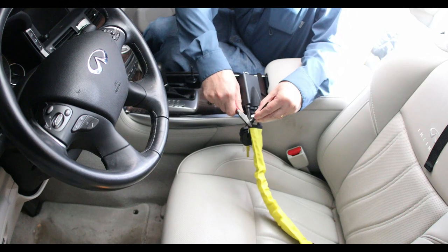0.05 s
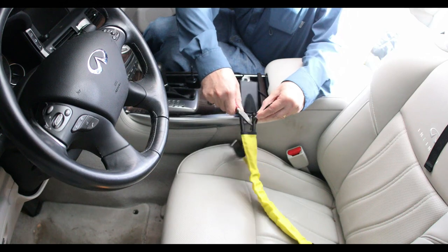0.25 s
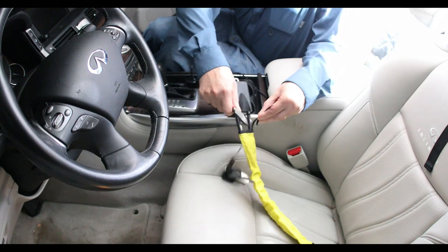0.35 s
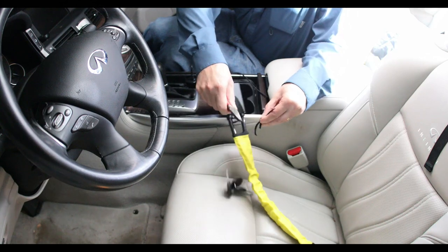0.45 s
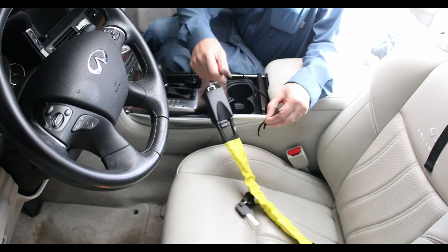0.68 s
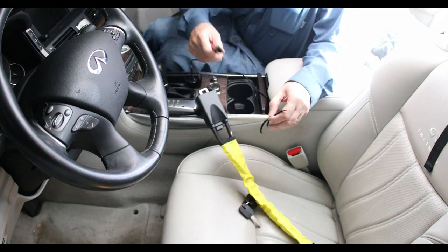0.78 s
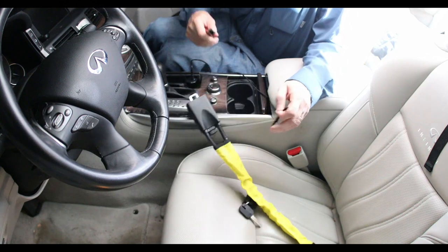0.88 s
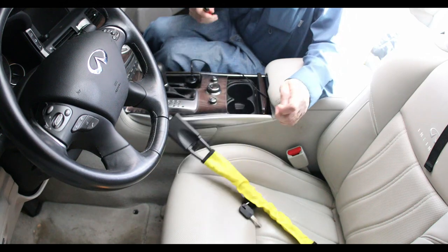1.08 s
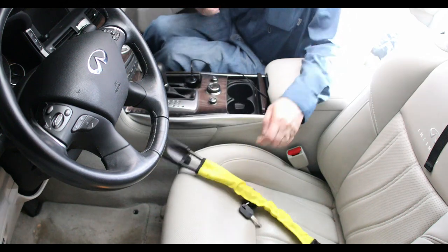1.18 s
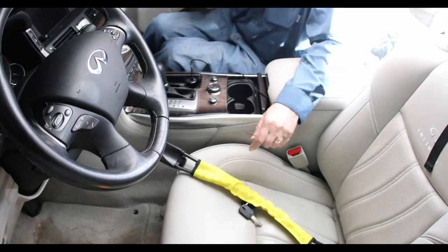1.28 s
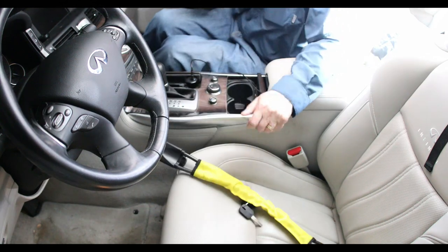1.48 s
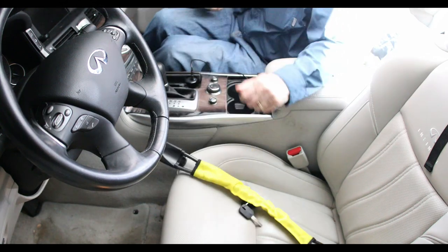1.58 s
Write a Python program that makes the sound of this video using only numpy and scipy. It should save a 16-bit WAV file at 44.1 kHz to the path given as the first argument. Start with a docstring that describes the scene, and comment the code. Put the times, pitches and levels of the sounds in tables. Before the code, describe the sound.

A steering wheel lock snaps open with a sharp metal click at 0.2 seconds, and its buckle springs free at 0.3 with a clack and low thump. A softer bump follows near 0.5. The strap rustles quietly over a leather seat until about 1.2 seconds, when the lock scrapes and knocks to rest with a light clink and faint keys. A tiny rattle follows near 1.6 in the padded car.

```python
"""A steering wheel lock is undone inside a car. First its steel latch snaps open; a tenth of a second
later the buckle springs free with a clack that thumps the console. Each impact excites damped modes.
The strap then slides over the softly rustling leather seat, its friction a grainy noise. Near 1.2 s
the lock head scrapes and knocks to rest by the wheel, keys chink and the steel bar clinks; last, the
latch rattles faintly. Throughout, the padded cabin answers the impacts briefly."""
import sys
import numpy as np
from scipy import signal
from scipy.fft import rfft, irfft, next_fast_len
from scipy.io import wavfile
from scipy.ndimage import map_coordinates

SR = 44100
rng = np.random.default_rng(int(sys.argv[2]) if len(sys.argv) > 2 else 0)


def transcribe(u):
    """Save the signal u as a 16-bit wav file named by the first command-line argument.

    u: samples, shape (n,) or (channels, n), limited to [-1, 1]; the rate is SR.
    q: integer samples, one column per channel.
    """
    v = np.clip(np.atleast_2d(u).T, -1, 1)
    q = np.round(v * 32767).astype(np.int16)
    wavfile.write(sys.argv[1], SR, q)


N = 72765
T = np.arange(N) / SR

# Crack spectrum of latch and bar. Each row: frequency in Hz, relative level in dB.
STEEL_CRACK = [(120, -49), (200, -10), (380, -15.5), (647, -29), (933, -22), (1230, -27), (1590, -25.5),
               (2090, 1.5), (2420, -8.5), (3620, -20), (4950, -3.5), (5520, -14.5), (7540, -8), (9060, -10),
               (16000, -30)]


def latch():
    """Impact excitation: the steel latch snaps and later rattles, with little bass."""
    # Each row: start in seconds, level in dB, tilt in dB per octave, rise in seconds.
    clicks = [(0.2136, -8.5, 0, 0.00027), (0.2665, -35.5, -0.5, 0.00067), (1.572, -44.5, -17, 0.0024)]
    # Each row: frequency in Hz, relative level in dB, T60 in seconds before added damping.
    modes = [(354, -11.5, 0.079), (897, -12, .06), (2090, 0.5, 0.046), (4420, -2.5, 0.049),
             (4623, -5.5, 0.05), (5014, 0.5, 0.04), (7030, -10.5, 0.05), (8300, -11.5, 0.036),
             (8720, -2, .024), (9250, -11, 0.077)]
    x = strikes(clicks, modes, STEEL_CRACK, ring_db=-2, crack_db=0, crack_t60=0.035, damping=1.3)
    return low_cut(x, hz=240)


def lock_head():
    """Free vibration: the lock head rings as the buckle springs free and again as it lands."""
    # Each row: start in seconds, level in dB, tilt in dB per octave, rise in seconds.
    knocks = [(0.3108, -28, -4, 0.00041), (0.3145, -9.5, 0.5, 0.00015), (1.2481, -34.5, -0.5, 0.00075)]
    # Each row: frequency in Hz, relative level in dB, T60 in seconds before added damping.
    modes = [(2010, -7.5, 0.2), (4130, 3, 0.051), (4340, 0.5, 0.032), (6480, -1.5, 0.024),
             (9500, -20, 0.13), (10610, -6, 0.038), (11970, -9, 0.048)]
    # Each row: frequency in Hz, relative level in dB.
    crack = [(180, -16), (300, 6), (420, -6.5), (700, -9), (1200, -22.5), (1450, -11.5), (2300, -18),
             (4200, -15.5), (5000, -20.5), (6700, -18.5), (9500, -33), (11500, -24), (16000, -40.5)]
    return strikes(knocks, modes, crack, ring_db=-2, crack_db=-0.5, crack_t60=0.078, damping=1.5)


def housing():
    """Shell resonance: the modes of the buckle's housing give the release its hollow clack."""
    # Each row: start in seconds, level in dB.
    clacks = [(.3122, -23.5), (0.3184, -21.5), (.461, -36)]
    # Each row: frequency in Hz, relative level in dB, T60 in seconds.
    modes = [(424, -3.5, 0.21), (593.8, 2, .12), (842, -5, .1), (1025, -4.5, .06), (1425, -3, .05),
             (1633, -3, .06)]
    return sum(delayed(amp(db) * ring(modes) * attack(0.0008), s) for s, db in clacks)


def thuds():
    """Heavy damping: padded console and seat turn each blow into a short, dull band of noise."""
    # Each row: start in seconds, level in dB, band centre in Hz, width in octaves, T60 in seconds.
    blows = [(.291, -38, 403, 2, 0.23), (.3118, -20.5, 293, 1.05, 0.087), (.3115, -23.5, 1560, 0.36, 0.03),
             (.459, -22.5, 225, 0.65, 0.13), (0.714, -37, 218, 0.24, 0.092), (.74, -35, 138, 0.21, .3),
             (1.211, -24.5, 348, 0.19, 0.048), (1.2502, -27.5, 1920, 2, 0.037),
             (1.412, -42, 329, 0.4, 0.32), (1.481, -39, 284, 0.34, 0.057), (1.629, -42, 218.5, 0.2, 0.16)]
    x = np.zeros(N)
    for s, db, centre, width, t60 in blows:
        band_db = lambda hz: -22 * np.log10(1 + (np.log2((hz + 1) / centre) / width) ** 2)
        treble_loss_db = lambda hz: 20 * np.log10(1 + (hz / 2200) ** 2)
        pad = noise(lambda hz: band_db(hz) - bass_loss_db(hz, 70) - treble_loss_db(hz))
        x += delayed(pad * amp(db - 60 * T / t60) * attack(0.0016), s)
    return x


def booms():
    """Enclosure resonance: the heavier blows ring the low modes of console and cabin."""
    # Each row: start in seconds, level in dB, tilt in dB per octave.
    blows = [(.316, -12.5, 3), (.464, -28, -5), (1.261, -44.5, 2), (1.322, -43.5, -5)]
    # Each row: frequency in Hz, relative level in dB, T60 in seconds.
    modes = [(74.9, -2, 0.21), (96.44, -0.5, 0.45), (146.2, -9, 0.36), (213.4, -12.5, 0.65), (258, 1, 0.11),
             (320, -3.5, 0.14)]
    return sum(delayed(amp(db) * ring(modes, tilt) * attack(0.0015), s) for s, db, tilt in blows)


def tongue():
    """Light impacts excite the high modes of the steel tongue as it brushes past things."""
    # Each row: start in seconds, level in dB, tilt in dB per octave, rise in seconds.
    ticks = [(0.3008, -27, 8, 0.0011), (.371, -27.5, -4, 0.0023), (.391, -35, 2.5, .0005),
             (0.4581, -30, -2.5, 0.0028), (0.6947, -35, -2, 0.00068), (1.2258, -32.5, 3.5, .0005)]
    # Each row: frequency in Hz, relative level in dB, T60 in seconds before added damping.
    modes = [(3410, -6, 0.055), (4500, -5, .04), (5410, 0, 0.065), (6030, -2, .04), (9100, -6.5, .05)]
    # Each row: frequency in Hz, relative level in dB.
    crack = [(300, -14.5), (1500, -5.5), (2900, -3.5), (5700, 1), (7500, -6.5), (12800, -16.5),
             (16000, -23.5)]
    return strikes(ticks, modes, crack, ring_db=-3, crack_db=-1, crack_t60=0.04, damping=1.4)


def bar():
    """Inharmonic modes of the steel bar ring as the lock head settles against it."""
    # Each row: start in seconds, level in dB, tilt in dB per octave, rise in seconds.
    clinks = [(1.3282, -28.5, -3.5, 0.0019)]
    # Each row: frequency in Hz, relative level in dB, T60 in seconds.
    modes = [(2000, -0.5, .05), (2390, -10, .035), (3415, -7, .04), (4600, -1, 0.042), (5700, -4, 0.032),
             (6250, -6, 0.039)]
    x = strikes(clinks, modes, STEEL_CRACK, ring_db=-1, crack_db=-2, crack_t60=0.036)
    return low_cut(x, hz=1100)


def keys(rise_s=0.00068, top_hz=13500):
    """Small plates have high modes: the keys chink as they collide after the landing."""
    # Each row: start in seconds, level in dB, tilt in dB per octave.
    chinks = [(1.2708, -36, -1), (1.282, -43, 0), (1.304, -49, 27), (1.343, -47.5, 5.5),
              (1.553, -54.5, -14)]
    # Each row: frequency in Hz, relative level in dB, T60 in seconds.
    modes = [(2850, -0.5, 0.038), (6380, -2, 0.029), (12260, -11, 0.043)]
    # Each row: frequency in Hz, relative level in dB.
    crack = [(1500, -14), (2900, 3.5), (4300, -12), (6600, -9), (10500, -30), (12100, -8), (13000, -32)]
    contacts = [(*chink, rise_s) for chink in chinks]
    x = strikes(contacts, modes, crack, ring_db=-0.5, crack_db=1.5, crack_t60=0.046)
    return filtered(x, lambda hz: 1 / (1 + (hz / top_hz) ** 20))


def strap(reflection_db=-8.5):
    """Sliding friction: the strap rubs, hisses and drives the resonances of the steel."""
    # Each row: time in seconds, rub level in dB, hiss level in dB.
    slide = [(.2, -89.5, -105), (.23, -45.5, -48), (.3, -56, -55.5), (.37, -44, -75), (.44, -52, -46),
             (.53, -54.5, -80), (.68, -59.5, -76), (.8, -60.5, -78), (.93, -62.5, -64), (.98, -62.5, -56.5),
             (1.07, -60.5, -56.5), (1.165, -52, -50), (1.183, -59.5, -64), (1.31, -53.5, -63),
             (1.37, -63, -75.5), (1.51, -70, -88), (1.56, -61, -86), (1.65, -65, -74.5)]
    # Each row of both spectra: frequency in Hz, relative level in dB.
    rub_spectrum = [(290, -45), (560, -10.5), (740, -17), (900, -4), (1160, -19.5), (1420, -5.5),
                    (2570, -13), (7980, -16.5), (16000, -43.5)]
    hiss_spectrum = [(400, -33), (586, -9), (880, -6.5), (1050, -16.5), (1380, -5.5), (2390, -11.5),
                     (3060, -13), (4280, -7), (15100, -19), (16000, -35.5)]
    # Each row: centre in Hz, bandwidth in Hz, relative level in dB.
    steel_peaks = [(3410, 120, -4), (3860, 80, -6.5), (4325, 150, 0), (5820, 360, -10.5)]
    # Each row: time in seconds, level of the metallic ring in dB.
    steel_levels = [(.2, -120), (.3, -58.5), (.66, -60.5), (.8, -57), (.92, -55), (1.11, -65.5),
                    (1.168, -55), (1.2, -92)]
    # Each row: time in seconds, base delay of the seat's reflections in seconds.
    seat_delays = [(.95, 0.00031), (1.08, 0.00049), (1.17, .0005)]
    rub_db, hiss_db = curves(slide)
    steel_db, = curves(steel_levels)
    lag, = curves(seat_delays)
    rub = friction(rub_spectrum, grain_db=2, grain_rate=500)
    steel = resonate(friction(rub_spectrum, grain_db=2, grain_rate=230), steel_peaks)
    hiss = friction(hiss_spectrum, grain_db=2, grain_rate=440)
    # Comb filtering: the delay grows as the lock head swings from the seat, so the hiss sweeps down.
    echo = lambda trips: amp(trips * reflection_db) * map_coordinates(hiss, [(T - trips * lag) * SR])
    swept_hiss = unit(hiss + echo(0.94) + echo(1.7))
    return amp(rub_db) * rub + amp(steel_db) * steel + amp(hiss_db) * swept_hiss


def scrape(start_s=1.192, rise_s=0.00039, hold_s=0.015, t60_s=0.3, level_db=-37.5):
    """Rough friction: the lock head drags coarsely as it lands."""
    # Each row: frequency in Hz, relative level in dB.
    spectrum = [(180, -30), (350, 3.5), (620, 3.5), (1150, 1), (2000, -4), (2900, -8.5), (3500, -6),
                (6000, -19), (9000, -16), (16000, -40)]
    t = T - start_s
    envelope = np.clip(t / rise_s, 0, 1) * amp(-60 * np.maximum(t - hold_s, 0) / t60_s)
    return amp(level_db) * envelope * friction(spectrum, grain_db=2.5, grain_rate=1100)


def hollow(start_width_hz=69):
    """A narrow resonance of the rub glides down as the lock head swings towards its landing."""
    # Each row: time in seconds, centre in Hz, level in dB.
    glide = [(.8, 2767, -100), (.96, 2696, -66), (1.09, 2374, -60), (1.135, 2080, -59.5),
             (1.172, 2000, -50), (1.195, 1990, -100)]
    hz, db = curves(glide)
    band = resonate(rng.standard_normal(N), [(hz[0], start_width_hz, 0)])
    position = np.cumsum(hz / hz[0])  # reading the band more slowly lowers its pitch
    return amp(db) * map_coordinates(band, [position], mode="mirror")


def seat():
    """Friction on a soft surface: leather drags with a low purr over the cushion's rumble."""
    # Each row: time in seconds, drag level in dB, rumble level in dB.
    levels = [(0, -78, -65), (.19, -70.5, -73), (.24, -59, -49.5), (.3, -86, -45.5), (.35, -36, -20),
              (.43, -48.5, -39), (.51, -40.5, -33.5), (.57, -55.5, -48.5), (.68, -55, -49.5),
              (.77, -61.5, -46), (.86, -52.5, -56.5), (.95, -51.5, -59), (1.04, -39, -62),
              (1.18, -46.5, -53), (1.28, -44.5, -36), (1.38, -64, -50), (1.5, -51.5, -49),
              (1.59, -64.5, -69.5)]
    # Each row of both spectra: frequency in Hz, relative level in dB.
    drag_spectrum = [(59, -49.5), (135, -22), (164, -3.5), (220, -1.5), (386, -12.5), (473, -33),
                     (900, -30), (1300, -70)]
    rumble_spectrum = [(20, -37.5), (45, -31), (70, -2), (150, 1), (220, -17), (500, -36.5), (8000, -70.5)]
    drag_db, rumble_db = curves(levels)
    edge_loss_db = lambda hz: 10 * np.log10((1 + (hz / 900) ** 6) * (1 + (90 / (hz + 1)) ** 6))
    drag = noise(lambda hz: along(drag_spectrum, hz) - edge_loss_db(hz))
    rumble = noise(lambda hz: along(rumble_spectrum, hz))
    return amp(drag_db) * drag + amp(rumble_db) * rumble


def trim(x, count=9, level_db=-9):
    """Interference: early reflections from console, door and seat back colour the sound."""
    lags_s = rng.uniform(0.001, 0.008, count)
    near = sum((-1) ** k * delayed(x, lag) for k, lag in enumerate(lags_s)) / np.sqrt(count)
    return (x + amp(level_db) * near) / np.sqrt(1 + amp(level_db) ** 2)


def cabin(x, level_db=-19.5):
    """Reverberation: the padded interior absorbs treble sooner than bass."""
    # Each row: frequency in Hz, T60 in seconds.
    decay_times = [(200, 0.6), (1500, 0.2), (6000, 0.11), (14000, 0.12)]
    hz, t, spectra = signal.stft(rng.standard_normal(SR // 3), SR, nperseg=256)
    decay = amp(-60 * t / along(decay_times, hz)[:, None])
    tail = signal.istft(spectra * decay, SR, nperseg=256)[1]
    return amp(level_db) * signal.fftconvolve(delayed(x, 0.004), tail / np.linalg.norm(tail))[:N]


def background(level_db=-76.5):
    """Stationary noise, faint and mostly low in pitch."""
    # Each row: frequency in Hz, relative level in dB.
    spectrum = [(15, -54.5), (53, -2), (123, 3), (624, -24), (7710, -47)]
    return amp(level_db) * noise(lambda hz: along(spectrum, hz))


def strikes(contacts, modes, crack, ring_db, crack_db, crack_t60, damping=1):
    """Each hard contact excites clear modes and a crack of dense, quickly dying ones."""
    x = np.zeros(N)
    for s, db, tilt, rise_s in contacts:
        slope_db = lambda hz: tilt * np.log2(hz / 1000 + 0.5)
        burst = noise(lambda hz: along(crack, hz) + slope_db(hz) - bass_loss_db(hz, 200))
        body = amp(ring_db) * ring(modes, tilt, damping) + amp(crack_db - 60 * T / crack_t60) * burst
        x += delayed(amp(db) * body * attack(rise_s), s)
    return x


def ring(modes, tilt=0, damping=1):
    """Modal sum of initial rms 1; damping divides each T60, the time to fall by 60 dB."""
    hz, db, t60 = np.transpose(modes)[:, :, None]
    t = T[:SR // 2]
    gain = amp(db + tilt * np.log2(hz)) * (-1) ** np.arange(len(hz))[:, None]
    x = np.sum(gain * amp(-60 * t * damping / t60) * np.sin(2 * np.pi * hz * t), axis=0)
    return np.pad(x, (0, N - len(t))) / np.sqrt(np.sum(gain ** 2) / 2)


def friction(spectrum, grain_db, grain_rate):
    """Stick-slip noise of rms 1: tiny slips whose size is redrawn grain_rate times a second."""
    knots = rng.standard_normal
    white = knots(N)
    grain = map_coordinates(knots(int(N * grain_rate / SR) + 4), [T * grain_rate])
    slips = white * amp(grain_db * grain)
    return unit(filtered(slips, lambda hz: amp(along(spectrum, hz)) / np.sqrt(1 + (300 / (hz + 1)) ** 6)))


def resonate(x, peaks):
    """Forced vibration: x drives parallel resonators of alternating sign; the result has rms 1."""
    def response(hz):
        return sum((-1) ** k * amp(db) * 1j * hz * width / (centre ** 2 - hz ** 2 + 1j * hz * width)
                   for k, (centre, width, db) in enumerate(peaks))
    return unit(filtered(x, response))


def noise(level_db):
    """Noise of rms 1 whose spectrum in dB is a function of Hz."""
    return unit(filtered(rng.standard_normal(N), lambda hz: amp(level_db(hz))))


def filtered(x, response):
    """Linear filtering: the spectrum of x times a frequency response."""
    size = next_fast_len(N + 8192)
    return irfft(rfft(x, size) * response(np.fft.rfftfreq(size, 1 / SR)), size)[:N]


def low_cut(x, hz):
    """A causal second-order high-pass: the bass is removed."""
    return signal.sosfilt(signal.butter(2, hz, "high", fs=SR, output="sos"), x)


def bass_loss_db(hz, corner_hz):
    """Attenuation of a second-order high-pass."""
    return 10 * np.log10(1 + (corner_hz / (hz + 1)) ** 4)


def attack(rise_s):
    """Exponential rise from 0 to 1."""
    return 1 - np.exp(-T / rise_s)


def delayed(x, s):
    """x starting at s seconds."""
    return np.pad(x, (round(s * SR), 0))[:N]


def along(points, hz):
    """Interpolation of (Hz, value) points on a logarithmic frequency axis."""
    knots_hz, values = np.transpose(points)
    return np.interp(np.log(hz + 1), np.log(knots_hz + 1), values)


def curves(rows):
    """One value per sample for each column after the time."""
    times, *columns = np.transpose(rows)
    return [np.interp(T, times, column) for column in columns]


def amp(db):
    """Decibels to gain."""
    return 10 ** (np.asarray(db) / 20)


def unit(x):
    """x scaled to rms 1."""
    return x / np.sqrt(np.mean(x ** 2) + 1e-20)


def scene():
    """Superposition of impacts, their reverberation, friction and a faint background."""
    hits = latch() + lock_head() + housing() + bar() + tongue() + keys() + thuds()
    floor = background()
    return (hits + cabin(hits) + booms() + trim(strap() + scrape()) + hollow() + seat() + floor)[None]


def record(dry):
    """Band limiting: a steep low-pass removes the highest treble."""
    top_hz, edge_hz = 15900, 300
    return filtered(dry[0], lambda hz: np.clip((top_hz - hz) / edge_hz + 0.5, 0, 1))[None]


dry = scene()
out = record(dry)
transcribe(out)
```